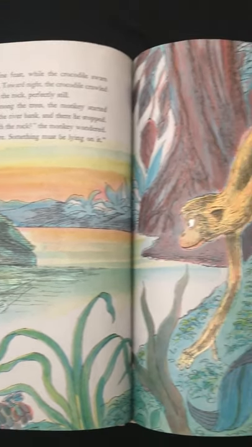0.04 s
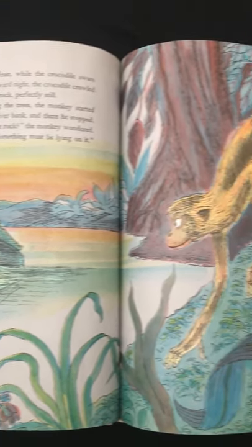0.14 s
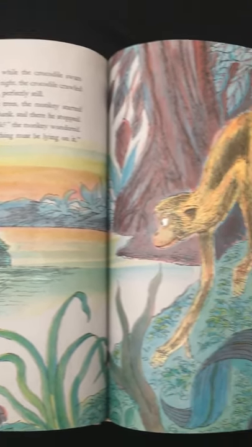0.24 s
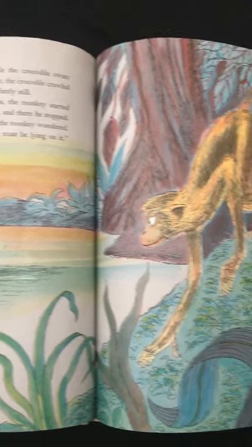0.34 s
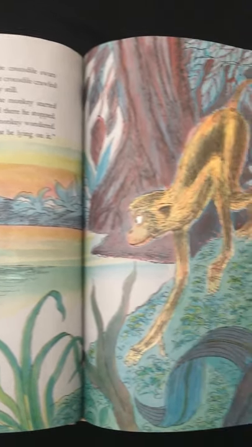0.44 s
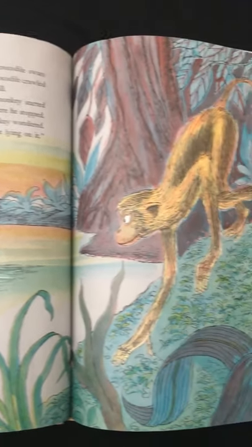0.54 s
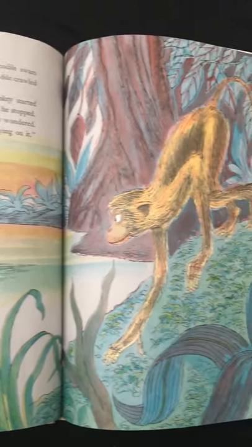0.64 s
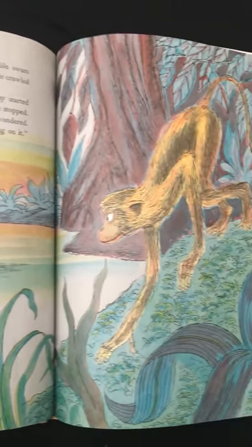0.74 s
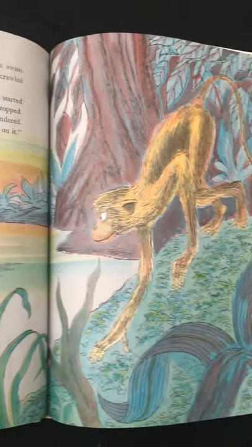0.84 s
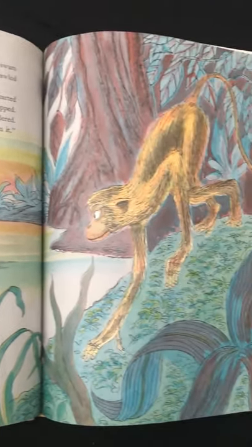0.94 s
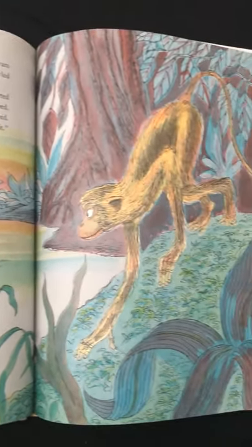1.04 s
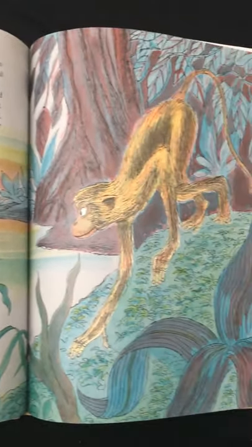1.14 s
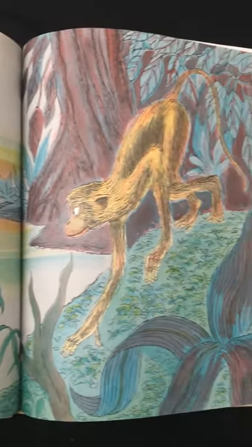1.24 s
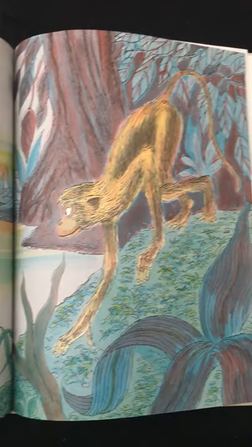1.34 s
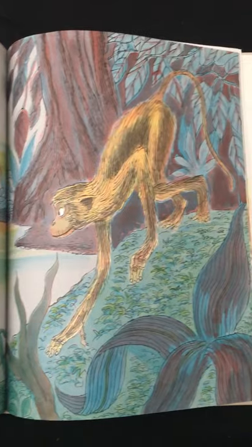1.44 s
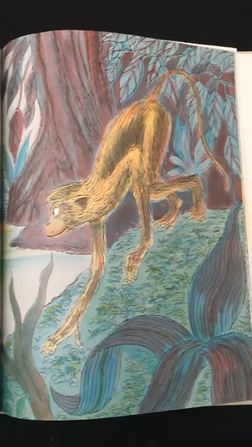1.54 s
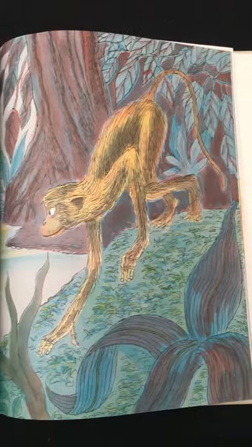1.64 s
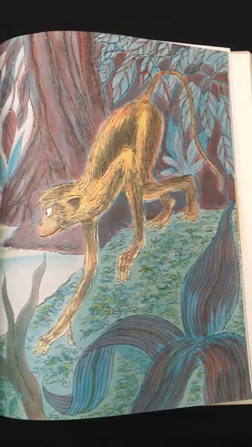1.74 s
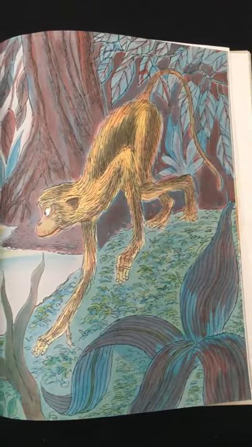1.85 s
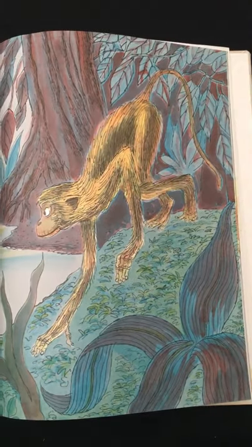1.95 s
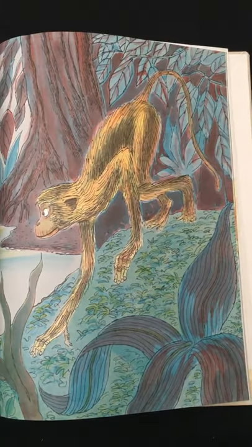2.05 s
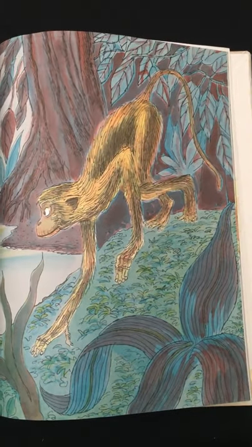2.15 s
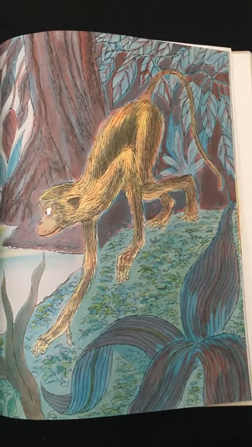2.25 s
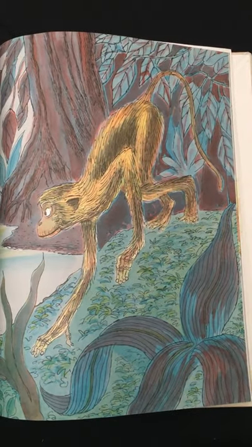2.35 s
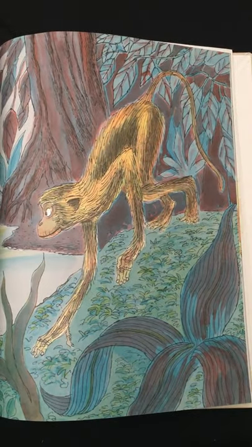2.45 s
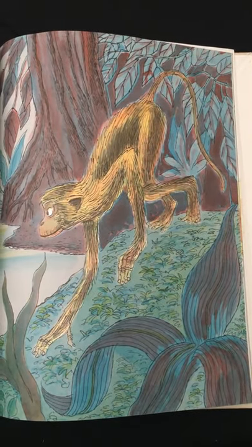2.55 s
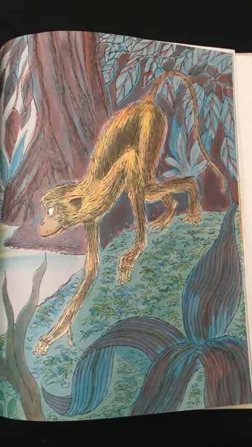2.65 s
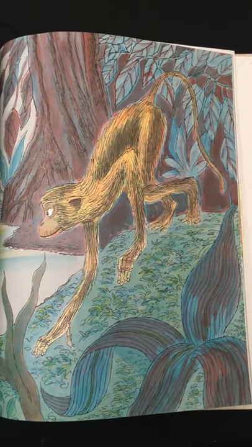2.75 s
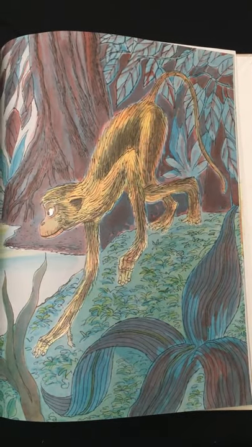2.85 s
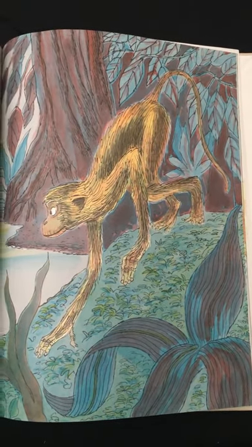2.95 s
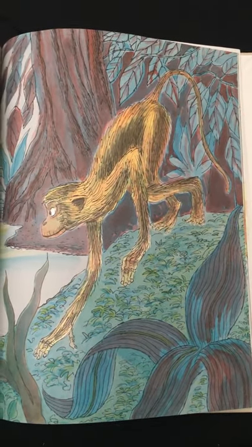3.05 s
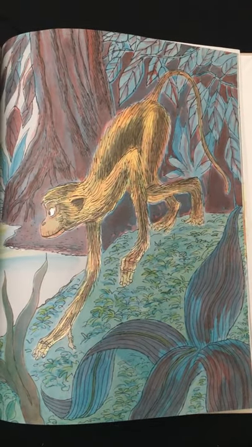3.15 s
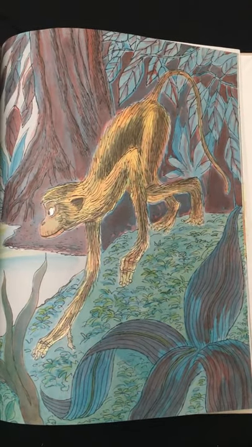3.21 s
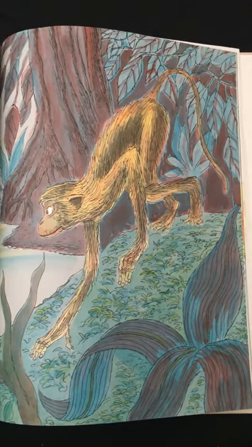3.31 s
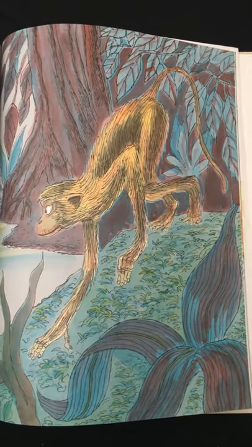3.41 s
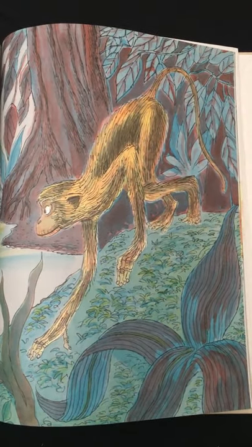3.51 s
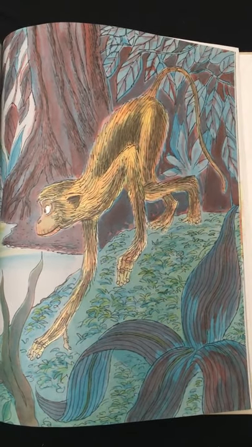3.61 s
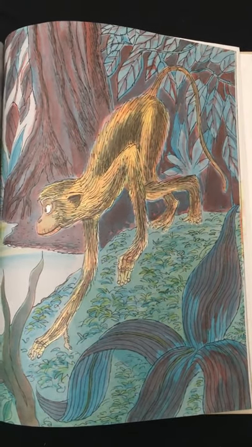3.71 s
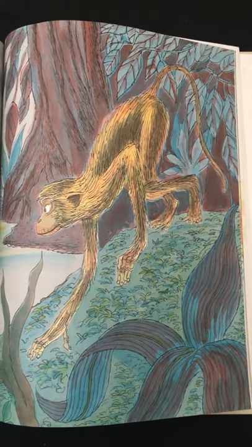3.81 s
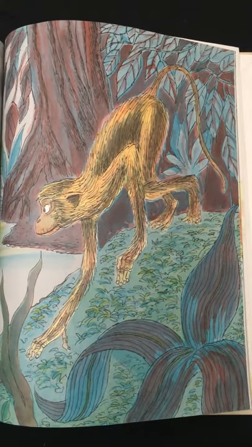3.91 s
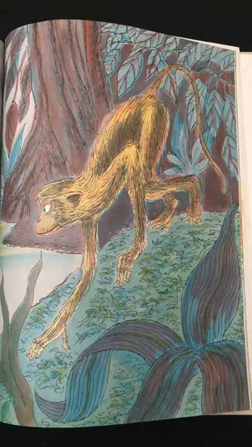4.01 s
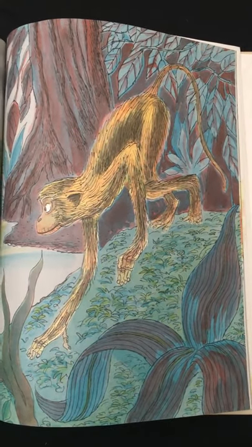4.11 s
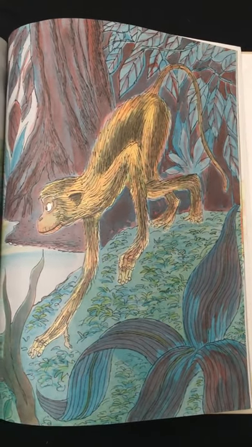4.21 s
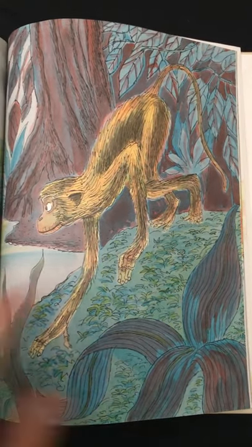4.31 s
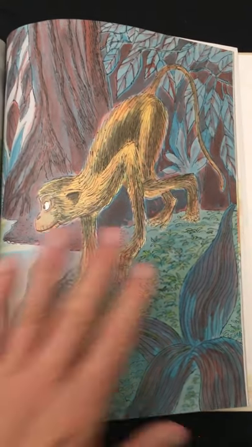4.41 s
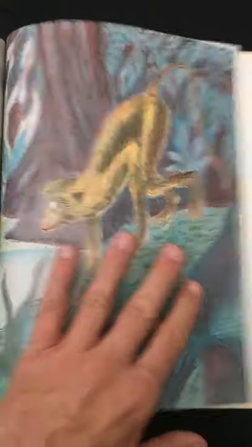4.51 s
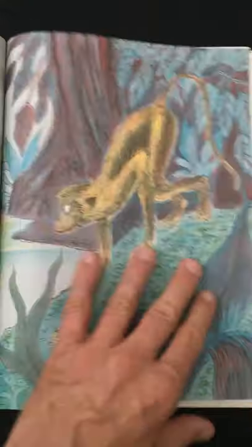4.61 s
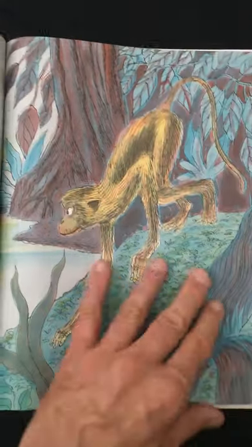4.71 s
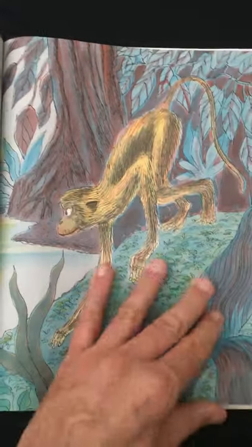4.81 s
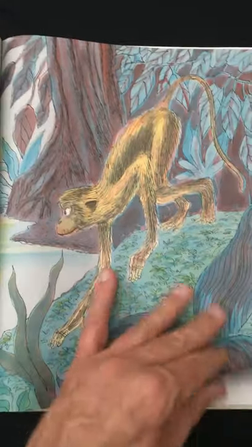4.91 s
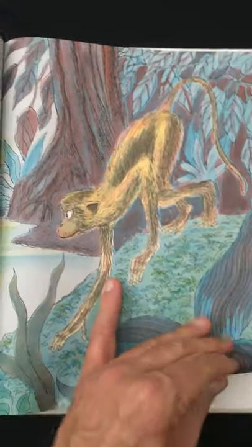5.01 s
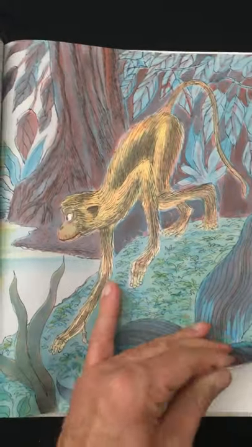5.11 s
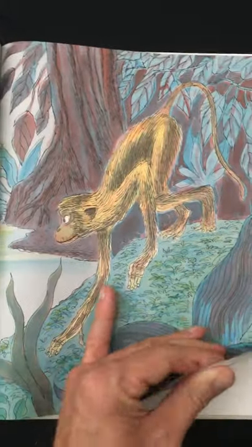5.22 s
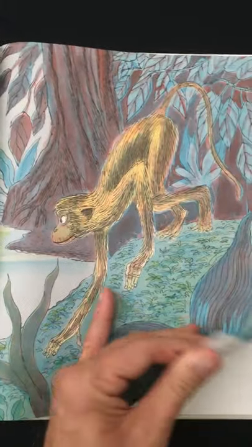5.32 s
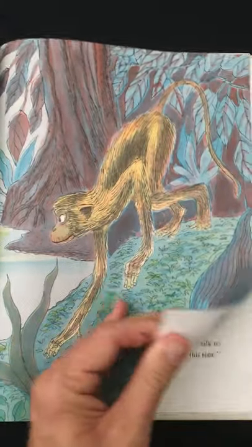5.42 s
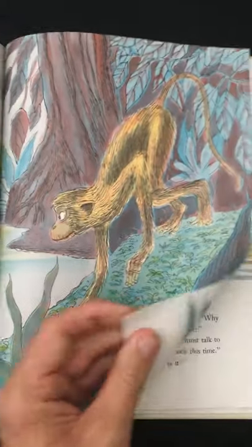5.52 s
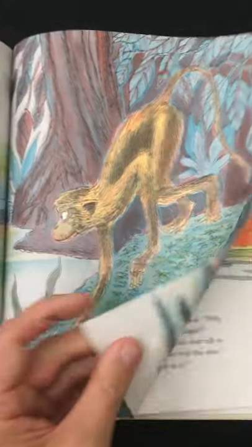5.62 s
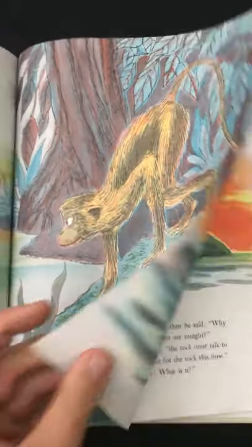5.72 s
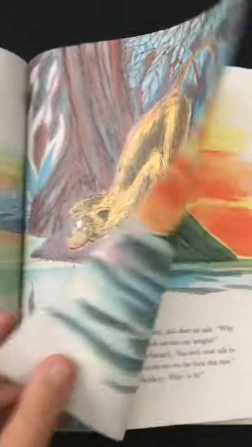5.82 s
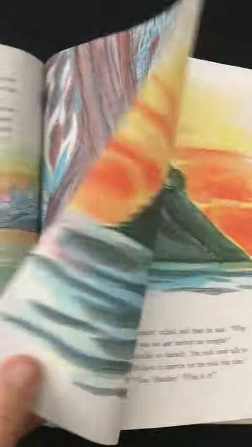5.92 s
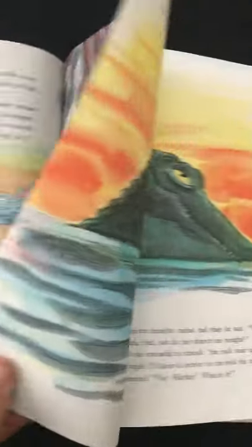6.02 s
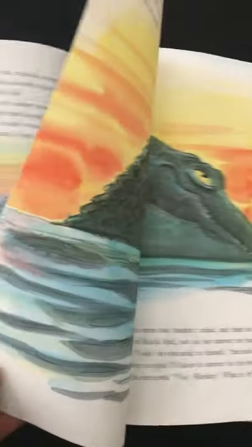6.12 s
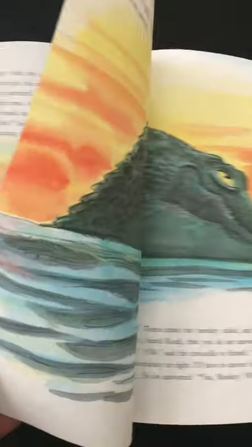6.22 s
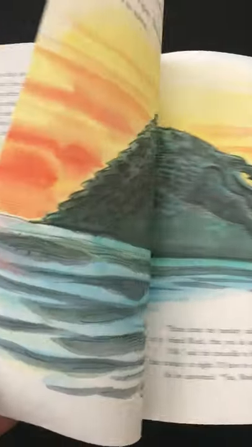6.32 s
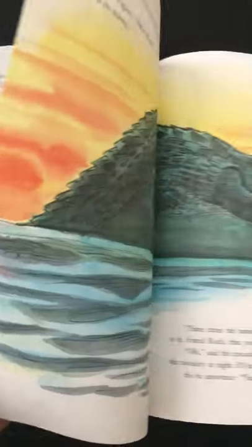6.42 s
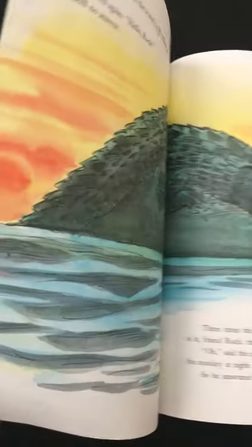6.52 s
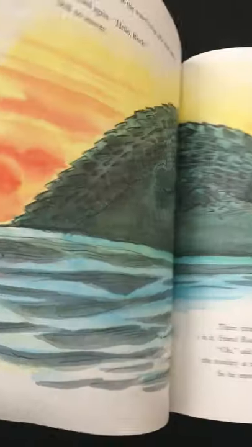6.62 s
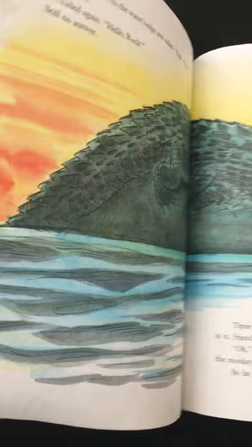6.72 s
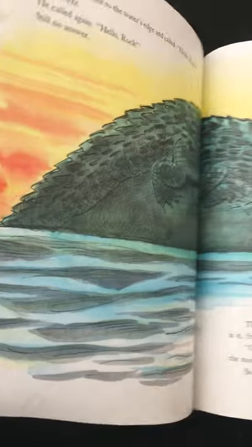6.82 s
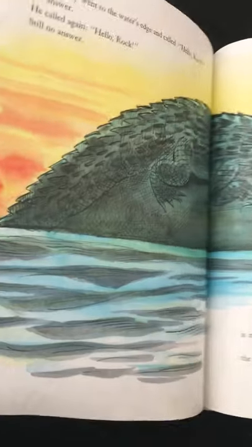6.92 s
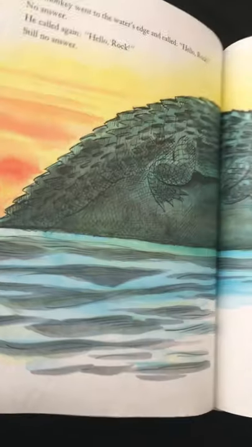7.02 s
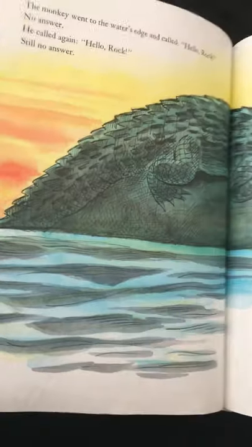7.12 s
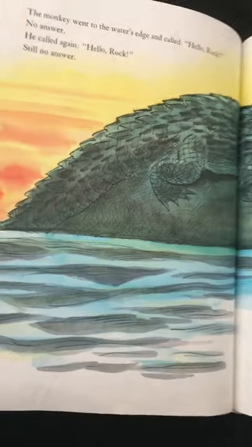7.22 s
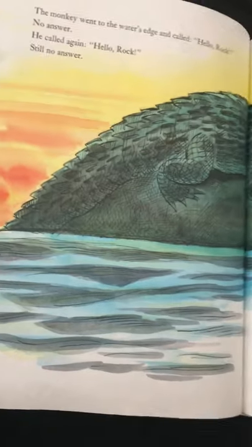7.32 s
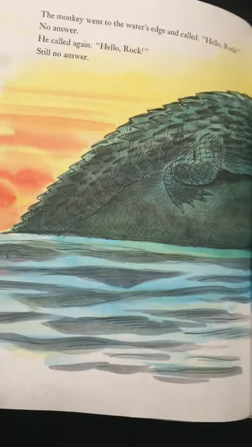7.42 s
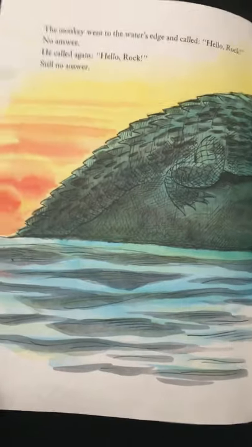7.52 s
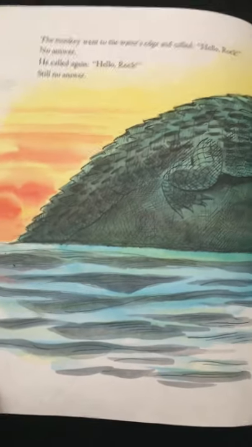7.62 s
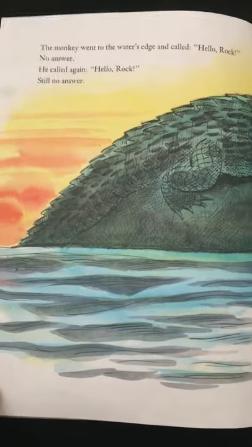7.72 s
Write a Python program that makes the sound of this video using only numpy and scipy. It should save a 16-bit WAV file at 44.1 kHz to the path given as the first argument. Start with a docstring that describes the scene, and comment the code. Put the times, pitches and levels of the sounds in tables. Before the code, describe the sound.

A book's spine crackles, then a hand slides over paper and turns a page with sharp snaps in a quiet room.

```python
"""A hardback picture book has a page turned, on a table in a small quiet room, close to a microphone.
After faint handling rustle and stray ticks, its glued spine cracks as the book shifts. A hand thumps
down and slides with a hiss of tiny fibres catching. The page bends with dull pops, snaps loose and is
drawn over. A wall echo and a short tail follow each sound; under it all the building rumbles faintly."""
import sys
import numpy as np
from scipy import signal
from scipy.io import wavfile
from scipy.ndimage import uniform_filter1d

SR = 44100
rng = np.random.default_rng(int(sys.argv[2]) if len(sys.argv) > 2 else 0)


def log_audio(samples):
    """Write samples as a 16-bit WAV file to the path given in sys.argv[1]."""
    # one column per channel
    frames = np.atleast_2d(samples).T
    # limit to full scale, then quantise
    limited = np.clip(frames, -1, 1)
    pcm = np.round(limited * 32767).astype(np.int16)
    wavfile.write(sys.argv[1], SR, pcm)


N = 341904

# Dull pops of the bending page. A "fade time", here and below, is the time to fall by 60 dB.
# (time [s], level [dB], final pitch [Hz], fade time [s])
PAGE_POPS = [(4.017, -48.5, 182, 0.086), (4.509, -41.5, 240, 0.041), (4.671, -37.5, 358, 0.0086),
             (4.702, -61, 257, 0.02), (4.7238, -41, 260, 0.023), (4.808, -40.5, 320, 0.031),
             (4.8386, -40.5, 308, 0.015), (4.872, -40, 300, 0.016), (4.99, -44, 300, 0.064),
             (5.053, -36.5, 277, 0.037), (5.087, -33, 430, 0.027), (5.152, -30, 315, 0.029),
             (5.265, -47, 330, 0.02), (5.294, -39.5, 217, 0.028), (5.484, -38, 380, 0.038),
             (7.178, -57, 197, 0.085), (7.226, -57, 345, .03)]


def gain(db):
    """Turns decibels into a number to multiply by."""
    return 10 ** (np.asarray(db) / 20)


def unit_rms(x):
    """Scales a signal so that its average power is 1."""
    return x / np.sqrt(np.mean(x ** 2) + 1e-20)


def unit_peak(x):
    """Scales a signal so that its biggest swing is 1."""
    return x / np.abs(x).max()


def look_up(points, hz):
    """Reads between the rows of a (frequency, value) table."""
    row_hz, value = np.transpose(points)
    return np.interp(np.log(hz + 1), np.log(row_hz + 1), value)


def add(mix, start_s, sound):
    """Lays a sound into the mix at the given time."""
    part = mix[round(start_s * SR):][:len(sound)]
    part += sound[:len(part)]


def shaped_noise(level_db, size, patch_bins, patch_frames, patch_db=2.0):
    """Noise that follows level_db(t, hz), with random louder and softer patches."""
    hop = size // 4
    t, hz = np.arange(N // hop + 5) * hop / SR, np.fft.rfftfreq(size, 1 / SR)
    real, imag, patches = rng.standard_normal((len(t), len(hz), 3)).T
    patches = unit_rms(uniform_filter1d(uniform_filter1d(patches, patch_bins, 0), patch_frames, 1))
    level = gain(level_db(t, hz[:, None]) + patch_db * patches)
    spectra = (real + 1j * imag) * level / np.sqrt(size / 3)
    return signal.istft(spectra, nperseg=size, noverlap=size - hop)[1][:N]


def background():
    """The building's low rumble, slowly swelling by chance, over the microphone's steady hiss."""
    # Tone of the rumble and hiss: (frequency [Hz], relative level [dB])
    spectrum = [(27, -33), (46, 5), (63, -1), (81, -8), (176, -3.5), (214, -13), (287, -16), (324, -12),
                (404, -19), (692, -21.5), (1150, -28.5), (1270, -26.5), (3380, -31), (12000, -34.5),
                (15800, -42)]
    swell_hz, phases = np.geomspace(.2, 1.5, 12)[:, None], rng.random((12, 1))

    def level_db(t, hz):
        dip_db = -7.5 * np.exp(-((hz - 4960) / 200) ** 2)  # a narrow gap in the hiss
        swell_db = 4 * unit_rms(np.sin(2 * np.pi * (swell_hz * t + phases)).sum(0))
        return look_up(spectrum, hz) + dip_db + swell_db / (1 + (hz / 80) ** 4)  # only deep bass swells
    return gain(-63) * unit_rms(shaped_noise(level_db, size=2048, patch_bins=5, patch_frames=5))


def stroke_levels(t, hz):
    """Level of the rustle and sliding in dB, by time and pitch; the air gap boosts one pitch range."""
    # Faint handling rustle (first three rows), then strokes of skin and paper on paper:
    # (start [s], length [s], start level [dB], end level [dB], treble tilt [dB per octave],
    # air gap pitch [Hz], air gap boost [dB], boost below 1 kHz [dB])
    strokes = [(0, 0.5, -77, -80.5, -5, 2800, 0, 0), (.45, 0.57, -76, -76, -3, 3000, 1, -2),
               (1.422, 0.56, -72, -91, -3, 3000, 2, 2), (2.212, 0.034, -67.5, -72, 7, 1740, 12, 7),
               (3.215, 0.11, -71.5, -69.5, 0.5, 2350, 5, 0), (3.313, 0.2, -67, -81, -1, 2300, 6.5, 9),
               (3.604, 0.24, -73.5, -82, -5, 2300, 2, -8), (3.915, 0.057, -74, -75, -6, 2200, 6, 10),
               (3.974, 0.068, -72, -79, -7, 880, 12, 20), (4.04, 0.033, -75, -72, 1, 2000, 5, -4),
               (4.503, 0.072, -61.5, -58, 4, 950, 2, 10), (4.563, .1, -59.5, -52.5, 4.5, 950, -2, 12),
               (4.65, 0.13, -60.5, -59.5, 3, 1100, 1, 1), (4.798, .11, -60, -52, 5.5, 1100, 3, -5),
               (4.91, 0.091, -51.5, -45.5, 2, 1690, -1.5, -1.5),
               (5.011, 0.055, -50, -52.5, 2, 1500, 0.5, -8), (5.103, 0.11, -63, -63, 0, 2200, 7, 14),
               (5.255, 0.074, -45.5, -56, 3, 2000, -1.5, -5),
               (5.325, 0.1, -53.5, -50, -2.5, 1980, -1, -5.5), (5.43, 0.088, -47.5, -52.5, 2.5, 1880, 3, 5),
               (5.527, 0.087, -56.5, -50, -0.5, 2280, 7, 1), (5.604, 0.14, -50.5, -61.5, -1.5, 1650, 10, 5),
               (5.734, .11, -61, -64, -1.5, 2400, 2.5, 6), (5.849, .135, -56, -53.5, -12.5, 1600, -2, -1.5),
               (5.986, 0.041, -68, -66, -10, 1700, 5, 10), (6.016, 0.14, -50, -63.5, -6, 2020, 6, 5.5),
               (6.151, 0.053, -62.5, -55, -7.5, 1810, 2.5, 1), (6.216, 0.026, -59, -67.5, -16, 1400, 1, 3),
               (6.3, 0.032, -58.5, -62.5, -23, 1000, 5, 11),
               (6.359, 0.12, -65, -57.5, -12.5, 1210, 1.5, 3.5),
               (6.496, 0.093, -63, -62, -10.5, 1100, 6, 9.5), (6.597, 0.035, -65, -64, -11, 1170, 2, 12),
               (6.644, .12, -62.5, -61, -7.5, 1160, 3, 8), (6.762, 0.094, -65.5, -60.5, -8.5, 2390, 2, 1),
               (6.856, .05, -66, -72, -5, 1400, 3, 5), (7.277, 0.053, -74, -68, -12, 2050, 0, -8),
               (7.344, 0.068, -59, -66, -5, 2800, 4.5, -19), (7.468, .03, -77, -73, -2, 2500, 5, -11),
               (7.537, 0.11, -75, -79, 3, 2100, 1, -4)]
    # Basic tone of the rubbing: (frequency [Hz], relative level [dB])
    rub_tone = [(150, -15), (450, -8), (700, -2), (1100, 4.5), (1700, 0), (2600, 0.5), (4200, 0.5),
                (6500, -3), (9000, -3), (16000, -16)]
    rise_s, stop_s, arch_db = 0.015, 0.022, 2.5  # the arch: the hand is fastest in mid stroke
    brighten, gap_glide = .3, 0.043  # for each dB louder: added tilt [dB per octave], gap rise [octaves]
    power = np.zeros((len(hz), len(t)))
    treble_octaves = np.log2(1 + (hz / 4000) ** 2) / 2
    for start, length, start_db, end_db, tilt_db, gap_hz, gap_db, low_db in strokes:
        moving = np.clip(np.minimum((t - start) / rise_s, (start + length - t) / stop_s) + .5, 0, 1)
        on = moving > 0
        progress = np.clip((t[on] - start) / length, 0, 1)
        drift_db = (end_db - start_db) * (progress - .5) + arch_db * np.sin(np.pi * progress)
        gliding_hz = gap_hz * 2 ** (gap_glide * drift_db)
        gap = np.exp(-(np.log((hz + 1) / gliding_hz) / 0.6) ** 2)
        treble_db = (tilt_db + brighten * drift_db) * treble_octaves
        bass_db = low_db / (1 + (hz / 1000) ** 4)
        tone = gain(look_up(rub_tone, hz) + treble_db + gap_db * gap + bass_db)
        level = moving[on] * gain((start_db + end_db) / 2 + drift_db)
        power[:, on] += level ** 2 * tone ** 2 / (tone ** 2).mean(0)
    return 10 * np.log10(power + 1e-18)


def rustle_and_sliding():
    """Faint handling rustle, then the hiss of paper fibres catching; a quick flutter adds grit."""
    grit_db = 1.35 * unit_rms(uniform_filter1d(rng.standard_normal(N), size=90))
    return shaped_noise(stroke_levels, size=256, patch_bins=5, patch_frames=24) * gain(grit_db)


def ringing(tones, pitch_spread, lag_cycles, chance):
    """One fading tone per (Hz, dB, fade time) row; low bending waves are slow, so bass swells later."""
    t = np.arange(2000) / SR
    hz, db, fade_s = (column[:, None] for column in np.transpose(tones))
    hz = hz * (1 + pitch_spread * (chance[:len(hz), None] - .5))
    phases = chance[-len(hz):, None]
    swell = 1 - np.exp(-(t * hz / lag_cycles) ** 2)
    return gain(db - 60 * t / fade_s) * swell * np.sin(2 * np.pi * (hz * t + phases))


def papery_ring(lowest_hz, fade_scale, count=24):
    """A brief papery ring of many close tones at random pitches, never the same twice."""
    # How paper rings at each pitch: (frequency [Hz], relative level [dB], fade time [s])
    paper = [(1020, 11.5, 0.0037), (2040, -2, 0.015), (4050, -3, 0.016), (7250, -10.5, 0.0078),
             (12000, -13.5, 0.0087)]
    paper, chance = np.array(paper), rng.random((3, count))
    hz = lowest_hz * (12000 / lowest_hz) ** ((np.arange(count) + chance[0]) / count)
    tones = np.transpose([hz, look_up(paper[:, :2], hz), fade_scale * look_up(paper[:, ::2], hz)])
    return unit_peak(ringing(tones, pitch_spread=0, lag_cycles=0.67, chance=chance[1:].ravel()).sum(0))


def tick(fade_s):
    """A sharp edge: a very short burst of high noise."""
    t = np.arange(2000) / SR
    burst = signal.lfilter(*signal.butter(1, [5000, 12000], "bandpass", fs=SR), rng.standard_normal(len(t)))
    return unit_peak(burst * gain(-60 * t / fade_s))


def ticks_and_snaps():
    """Faint stray ticks and creaks, then snaps of the turning page, each with a short hiss."""
    # The first five rows are the stray sounds. Tick and hiss levels are relative to the ring:
    # (time [s], level [dB], ring length [factor], tick [dB], hiss [dB], hiss length [s])
    clicks = [(0.258, -57, .4, -15, -13, 0.0053), (.385, -60, .4, -15, -9, .006),
              (.712, -64, .4, -10, -9, .008), (0.73, -62, 0.36, -10, -6, .006),
              (1.959, -61, .4, -12, -12, .008), (3.536, -53, 0.44, -16, -10.5, .006),
              (4.5004, -43, 0.55, 5, -3.5, 0.017), (4.642, -40.5, 1, 1, 5, 0.0032),
              (5.0876, -33, 0.19, -14, -5.5, .011), (5.113, -46, .6, -14, -9, 0.0035),
              (5.139, -15, 0.33, -41, -22, 0.014), (5.1702, -18.5, 0.71, -8, -27, 0.036),
              (5.4787, -34.5, 0.53, -13, -4, 0.011), (5.4863, -10.5, 0.33, -35, -35, 0.04),
              (7.179, -58, 0.9, -17, -24, .01), (7.487, -56, 0.56, -9, -20, .008),
              (7.668, -55, 0.3, -16.5, -2, 0.011)]
    lifted_s, bounce_s, bounce_db = 5.4, .00091, -4
    out, t = np.zeros(N), np.arange(3000) / SR
    hiss_band = signal.butter(1, [1500, 9000], "bandpass", fs=SR)
    for start, db, fade_scale, tick_db, hiss_db, hiss_s in clicks:
        hiss = unit_rms(signal.lfilter(*hiss_band, rng.standard_normal(len(t))))
        hiss *= gain(hiss_db - 6 * t / hiss_s) / (1 + (t / hiss_s) ** 12)
        click = gain(db) * (papery_ring(933, fade_scale) + gain(tick_db) * tick(fade_s=0.0056))
        # once the page is lifted, the sound bounces between it and the page below
        for bounce in range(4 if start > lifted_s else 1):
            add(out, start + bounce * bounce_s, click * gain(bounce * bounce_db))
        add(out, start, gain(db) * hiss)
    return out


def spine_cracks():
    """The glued spine lets go: each crack ticks and sets the paper and the stiff covers ringing."""
    # Cracks: (time [s], level [dB], paper against covers [dB], tick against covers [dB],
    # cover pitch [factor], change to the upper cover tones [dB])
    cracks = [(0.777, -41.5, -12, -31, 0.93, -10), (0.87, -56.5, 1, 3, 1.3, -17),
              (0.891, -45, -18, -12, 1.05, -9), (0.903, -41, -5, -1, 1.08, -14.5),
              (0.991, -38.5, -5.5, -10, 1.13, -20), (1.043, -27, -4, -9, 0.97, -14),
              (1.115, -37, -8, 8, 1.22, -11), (1.119, -23, -4, -9, 1.02, -7.5),
              (1.183, -19.5, -8, 3.5, 1.01, -8.5), (1.208, -33, -1, 4, 1.2, -1),
              (1.213, -20.5, -16, 8, 0.94, -10.5), (1.328, -21, -1, -3, 1.03, -7),
              (2.042, -42.5, -12, -21, 1.07, -15.5), (3.201, -48.5, -12, -8, 1.04, -14.5),
              (3.836, -57.5, -19, -20, 0.96, -11), (4.009, -44.5, -26, -29, 0.92, -28),
              (4.509, -42, 2.5, 10, 0.87, -12), (4.55, -42, -3, 5, 1.4, -9),
              (4.559, -35.5, -12, -19, 1.02, -14), (4.601, -28, -8, -3, 0.96, -6.5),
              (4.607, -31.5, -9, -1, 0.91, -3), (4.615, -31.5, -3, 6, 0.93, -9),
              (4.634, -49, 4, 4, 1.1, -14), (6.961, -51.5, -2, -17, 1.36, -15),
              (6.971, -55, -5, -20, 1.34, -15)]
    # Tones of the covers: (frequency [Hz], relative level [dB], fade time [s])
    cover_tones = [(347, -28.5, 0.031), (775, 1, 0.014), (1250, 1.5, 0.014), (1582, 6.5, 0.0079)]
    out, travel_s = np.zeros(N), 0.00059
    is_upper = np.array(cover_tones)[:, :1] > 1000
    for start, db, paper_db, tick_db, pitch, upper_db in cracks:
        tuned = np.multiply(cover_tones, [pitch, 1, 1])
        rings = ringing(tuned, pitch_spread=0.054, lag_cycles=0.63, chance=rng.random(20))
        covers = unit_peak((rings * gain(upper_db * is_upper)).sum(0))
        paper = gain(paper_db) * papery_ring(lowest_hz=1740, fade_scale=0.95)
        crack = covers + paper + gain(tick_db) * tick(fade_s=0.0047)
        add(out, start + travel_s, gain(db) * crack)
    return out


def page_pops():
    """The page bends with dull pops that fall in pitch, because high bending waves arrive first."""
    out, t = np.zeros(N), np.arange(8000) / SR
    for start, db, hz, fade_s in PAGE_POPS:
        cycles = np.cumsum(hz * (1 + 5.5 * np.exp(-t * hz / 0.22))) / SR
        # echoes within the page make the fade uneven
        uneven_db = 5 * unit_rms(uniform_filter1d(rng.standard_normal(len(t)), size=70))
        rise = 1 - np.exp(-t * hz / 0.24)
        add(out, start, gain(db + uneven_db - 60 * t / fade_s) * np.sin(2 * np.pi * cycles) * rise)
    return out


def pages_settling():
    """The pressed pages settle with a soft low rumble after each pop."""
    relative_db, rise_s, fade_s = -19, 0.002, 0.24
    low_band = signal.butter(2, [140, 420], "bandpass", fs=SR, output="sos")
    rumble = unit_rms(signal.sosfilt(low_band, rng.standard_normal(N)))
    level, t = np.zeros(N), np.arange(SR // 2) / SR
    for start, db, _, _ in PAGE_POPS:
        add(level, start, gain(db + relative_db - 60 * t / fade_s) * (1 - np.exp(-t / rise_s)))
    return rumble * level


def palm_thump():
    """The palm lands on the stack of pages: one deep tone that dies quickly."""
    start_s, db, hz, rise_s, fade_s = 4.512, -38.5, 55, 0.0013, .1
    out, t = np.zeros(N), np.arange(8000) / SR
    add(out, start_s, gain(db - 60 * t / fade_s) * np.sin(2 * np.pi * hz * t) * (1 - np.exp(-t / rise_s)))
    return out


def room_echoes(sound):
    """Sound scatters off the table, echoes from the nearest wall, then dies away in the room."""
    # The room's fading tail: (frequency [Hz], fade time [s], relative level [dB])
    tail_bands = [(300, 0.087, 3), (800, 0.29, -5.5), (1610, 0.21, 3), (3870, 0.3, -2), (12000, 0.13, 2.5)]
    scatter_db, tail_db, wall_db, wall_delay_s = -16.5, -17.5, -21, .0148
    reflections = np.zeros(SR // 2)
    slots = np.arange(60, len(reflections) - 20, 20)
    reflections[slots + rng.integers(0, 20, len(slots))] = rng.choice([-1., 1.], len(slots))
    scatter = reflections[:600] * gain(scatter_db) / np.linalg.norm(reflections[:600])
    # small things scatter little bass and swallow treble
    scatter = signal.lfilter(*signal.butter(1, [1100, 6000], "bandpass", fs=SR), scatter)
    reflections[:600] = 0  # only the later ones make the tail
    hz, t, spectra = signal.stft(reflections, SR, nperseg=256)
    fade_s, db = (look_up(np.array(tail_bands)[:, [0, k]], hz)[:, None] for k in (1, 2))
    echoes = signal.istft(spectra * gain(db - 60 * t / fade_s), SR, nperseg=256)[1]
    echoes *= gain(tail_db) / np.linalg.norm(echoes)
    add(echoes, 0, scatter)
    add(echoes, wall_delay_s, gain(wall_db) * signal.windows.hann(5) / 2)
    return signal.fftconvolve(sound, echoes)[:N]


def scene():
    """The direct sounds, their echoes and the background, in one channel."""
    direct = spine_cracks() + ticks_and_snaps() + page_pops() + palm_thump()
    direct += rustle_and_sliding() + pages_settling()
    return (direct + room_echoes(direct) + background())[None]


def record(dry):
    """The microphone has two dips in its treble and loses the deepest bass and the very top."""
    # Dips caused by its housing: (frequency [Hz], width [Hz], level [dB])
    housing_dips = [(7800, 700, -3.5), (10480, 890, -3.5)]
    bass_cut_hz, top_cut_hz = 43, 16500
    hz = np.linspace(0, SR / 2, 257)
    tone = gain(sum(db * np.exp(-((hz - centre) / width) ** 2) for centre, width, db in housing_dips))
    heard = signal.oaconvolve(dry, signal.firwin2(201, hz, tone, fs=SR)[None], "same")
    heard = signal.sosfilt(signal.butter(6, bass_cut_hz, "highpass", fs=SR, output="sos"), heard)
    top_cut = signal.firwin(255, top_cut_hz, window=("kaiser", 9), fs=SR)
    return signal.oaconvolve(heard, top_cut[None], "same")


dry = scene()
out = record(dry)
log_audio(out)
```